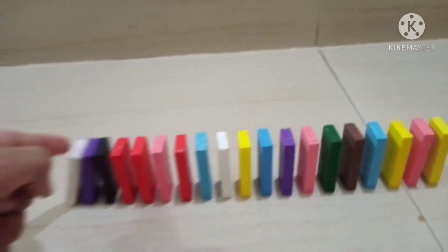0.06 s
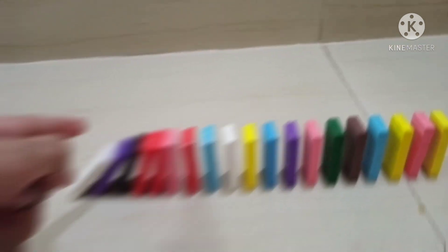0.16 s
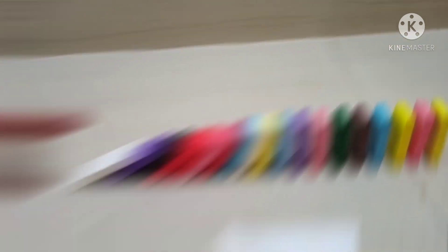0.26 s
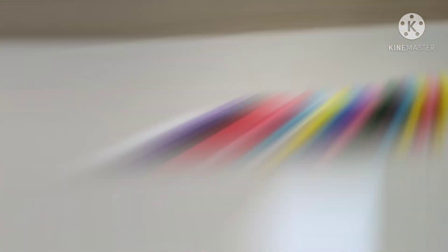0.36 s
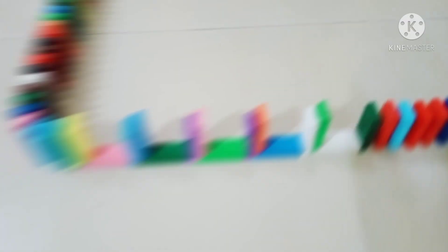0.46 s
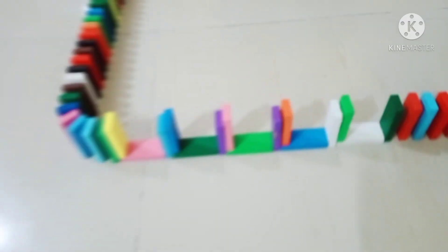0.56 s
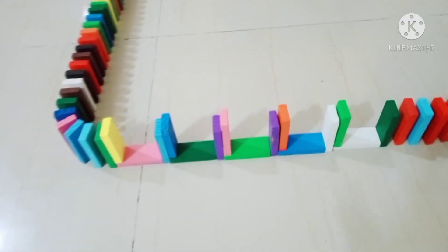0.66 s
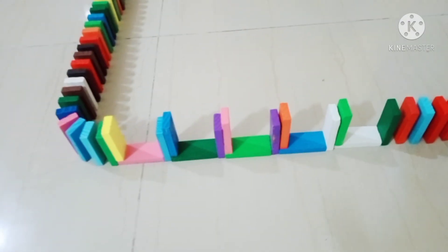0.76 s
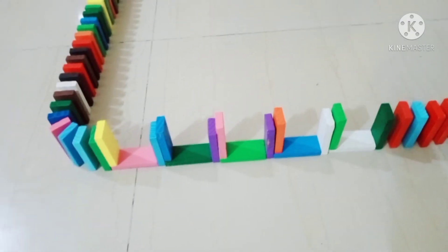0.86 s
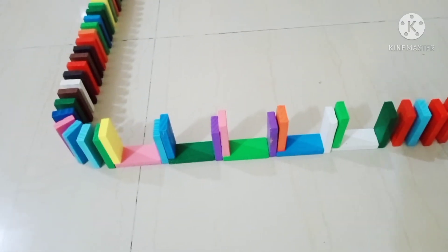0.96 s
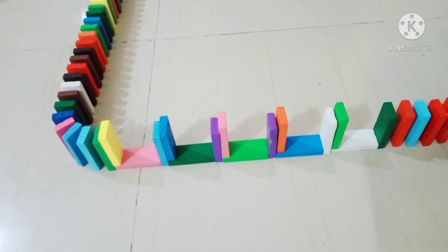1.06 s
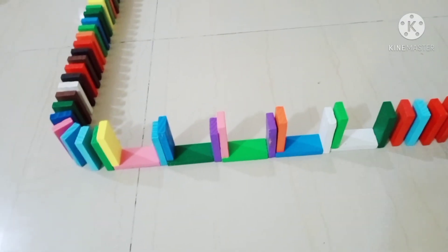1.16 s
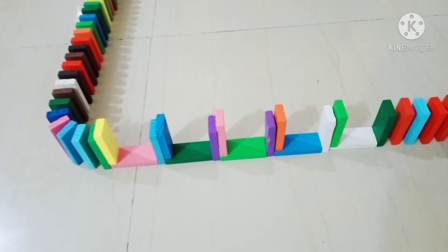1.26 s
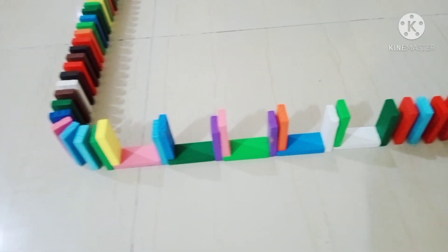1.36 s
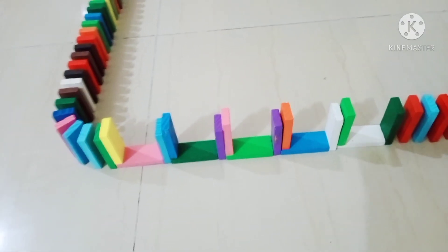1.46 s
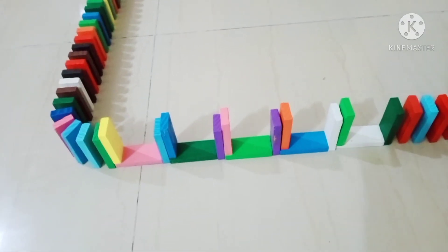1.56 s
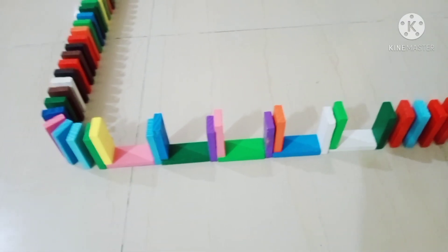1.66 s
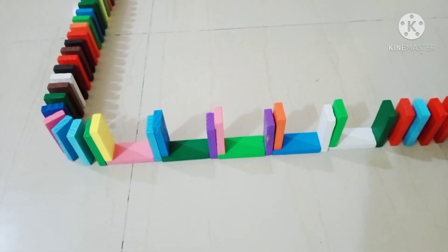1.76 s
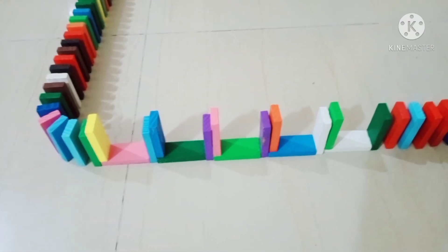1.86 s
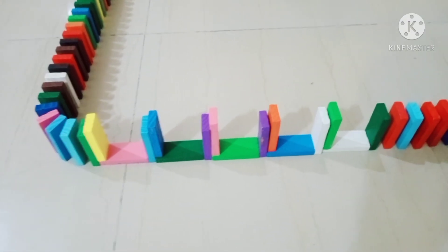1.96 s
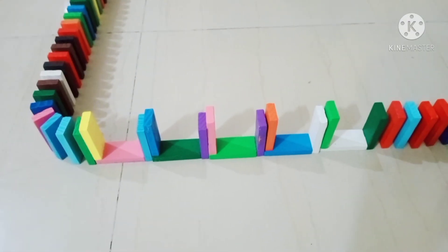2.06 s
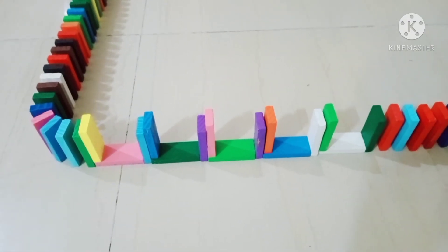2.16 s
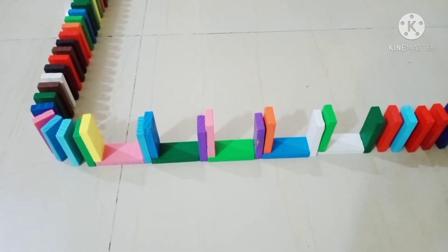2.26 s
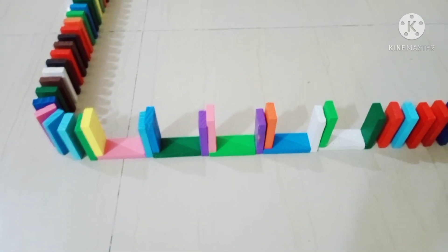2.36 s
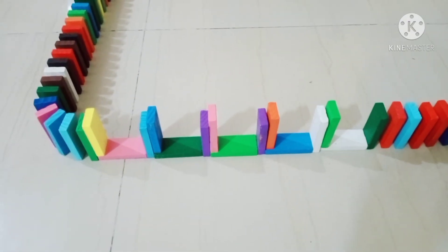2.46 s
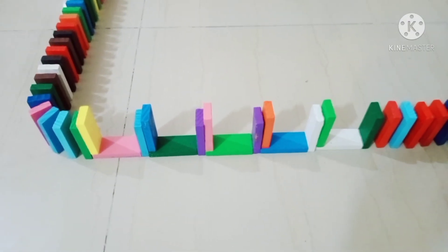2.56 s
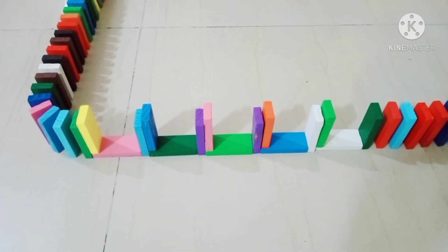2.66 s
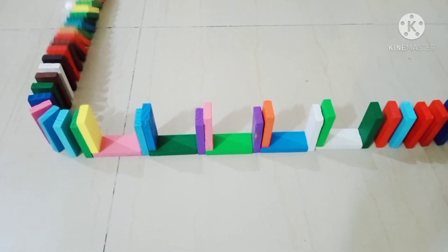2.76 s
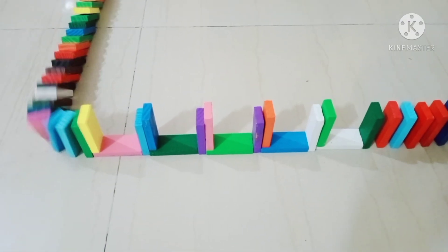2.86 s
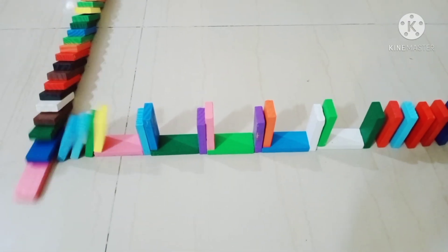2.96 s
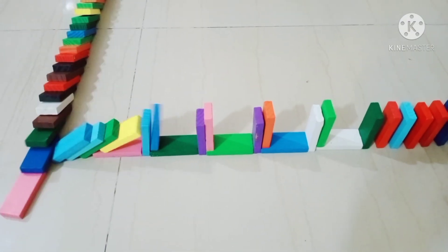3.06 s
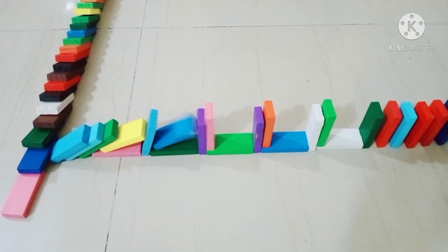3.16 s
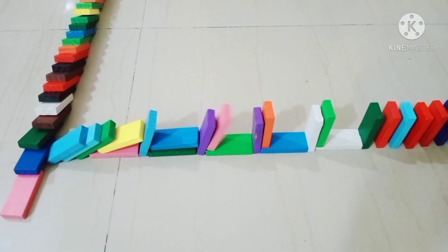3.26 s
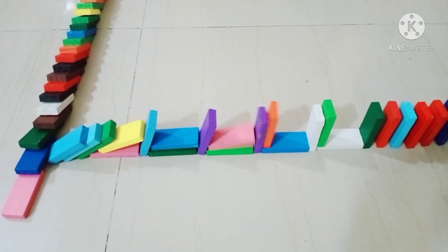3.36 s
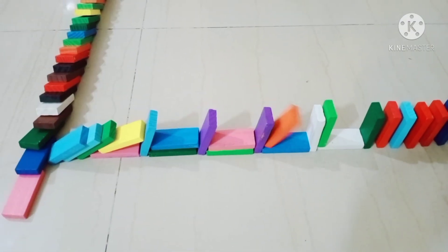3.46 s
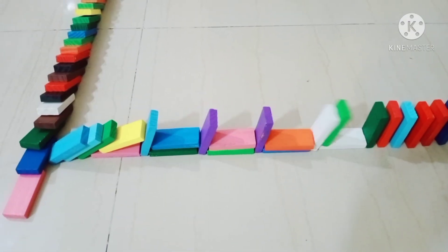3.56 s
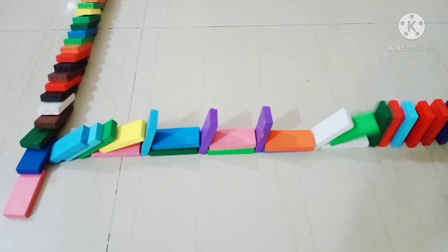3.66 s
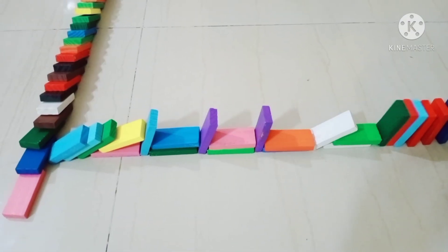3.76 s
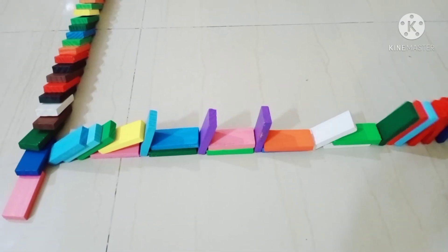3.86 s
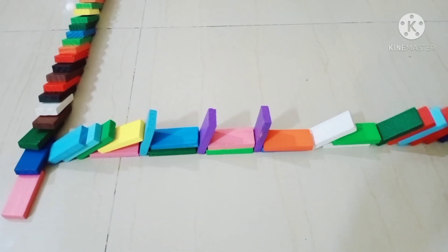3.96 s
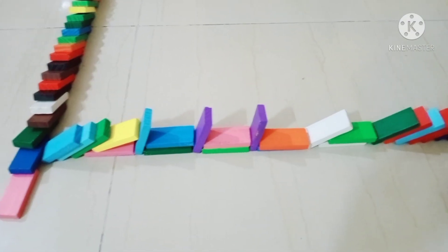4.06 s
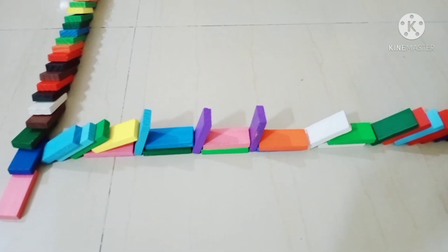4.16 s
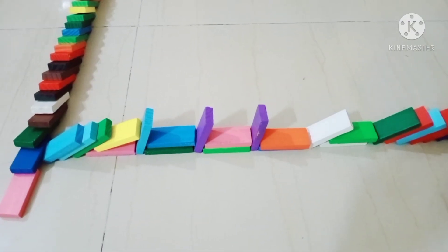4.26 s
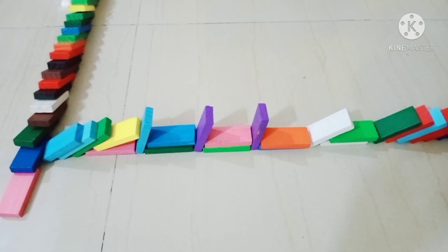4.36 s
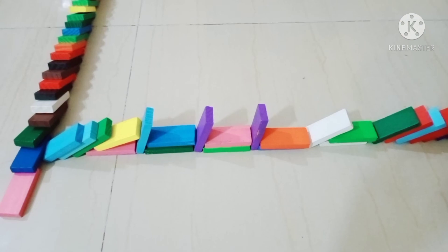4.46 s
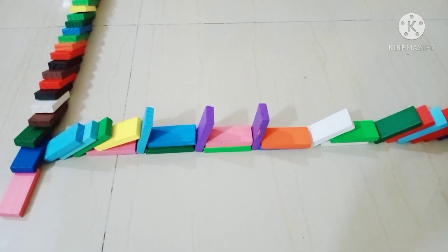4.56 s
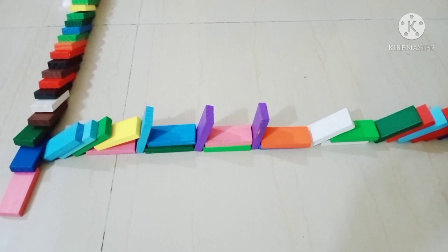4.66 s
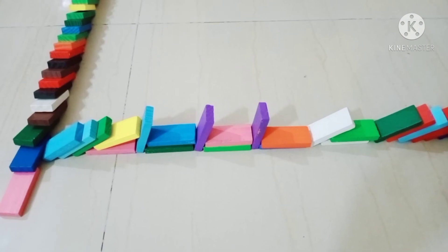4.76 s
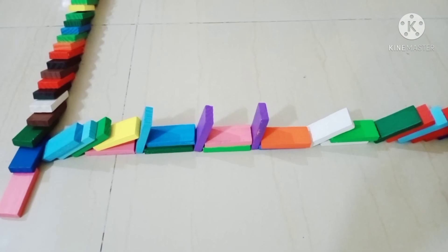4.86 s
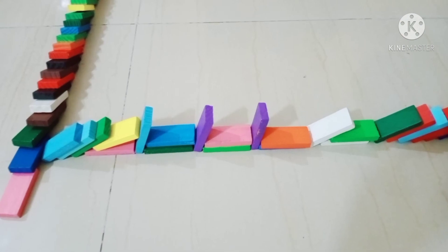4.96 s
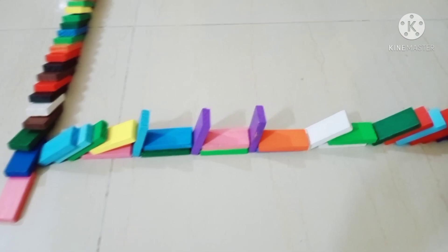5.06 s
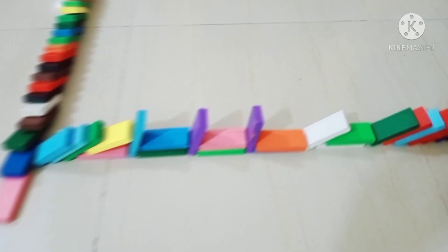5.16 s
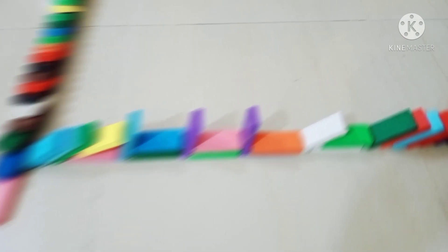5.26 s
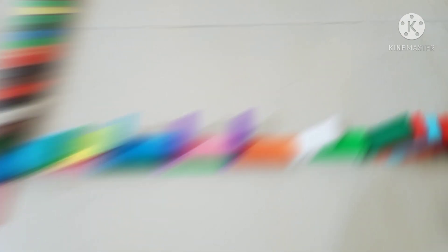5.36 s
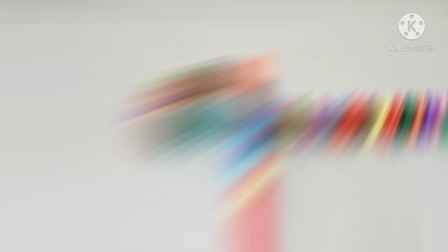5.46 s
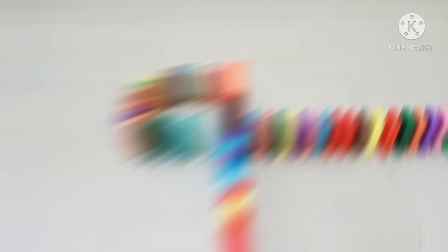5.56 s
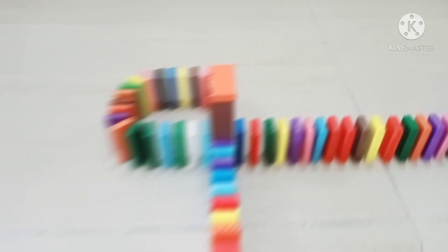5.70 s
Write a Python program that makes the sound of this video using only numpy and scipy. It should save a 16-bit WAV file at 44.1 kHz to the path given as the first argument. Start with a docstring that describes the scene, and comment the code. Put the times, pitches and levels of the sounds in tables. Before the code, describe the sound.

Close to a phone in a bare, hard-walled room, plastic dominoes start toppling, speeding up into a crisp burst that ends in a dull thump. After nearly two quiet seconds of faint room rumble, a second clatter passes, followed by separate sharp slaps of tile on tile. A third, dense clatter follows, then its bright echo fades into low room noise.

```python
"""Toppling rows of dominoes

Rows of plastic toy dominoes topple on a tiled floor in a bare room, close to a phone.
Three runs clatter past; around the second and up to the third, single tiles slap onto tiles lying flat.
Every collision is a short noise crack, decaying ring modes and a knock; a dense noise tail is the hard walls.
Under it lie filtered room noise, a faint low drone of wavering sines and one dull thump, a step in the
signal that swings back slowly."""
import sys
import numpy as np
from scipy import signal
from scipy.fft import rfft, irfft
from scipy.io import wavfile
from scipy.ndimage import uniform_filter1d

SR = 44100
rng = np.random.default_rng(int(sys.argv[2]) if len(sys.argv) > 2 else 0)


def transcribe(u):
    """Save the signal u as a 16-bit wav file named by the first command-line argument.

    u: samples, shape (n,) or (channels, n), limited to [-1, 1]; the rate is SR.
    q: integer samples, one column per channel.
    """
    v = np.clip(np.atleast_2d(u).T, -1, 1)
    q = np.round(v * 32767).astype(np.int16)
    wavfile.write(sys.argv[1], SR, q)


N = 252693
TIME = np.arange(N) / SR
TOP_HZ = 15700
CLICK_S = 0.00048  # reference length of a click: its main ring carries the energy of unit power held this long
THUMP_S = 0.5269

# a row gathers speed, tumbles on and runs out; its echo share grows or shrinks as the front moves off or nears:
# start/s, rise/s, hold/s, fall/s, clatter level at full speed/dB, typical ring f/Hz, typical knock f/Hz,
# basic knock level/dB, floor thud against the knock/dB, basic edge level/dB, room level at the start/dB,
# room growth/(dB/s)
RUNS = [(.24, .14, 0.054, .07, -30.5, 9230, 2750, -12, -17.5, -6, -4.5, -12),
        (2.461, 0.16, .15, 0.0738, -28.5, 8660, 3850, -15.5, -9, -14, -6.5, 5),
        (3.87, .09, .32, .05, -29, 8840, 3700, -16, -10, -11, -7.5, 14)]


def undb(db):
    """Decibels to gain."""
    return 10 ** (np.asarray(db) / 20)


def unit(x):
    """Scale to an rms of one."""
    return x / np.sqrt(np.mean(x ** 2))


def at_hz(points, hz):
    """Read a table on a log-frequency axis."""
    f, value = np.transpose(points)
    return np.interp(np.log(np.maximum(hz, 1)), np.log(f), value)


def noise(points):
    """Noise with the given spectrum, at an rms of one."""
    hz = np.arange(N // 2 + 1) * SR / N
    white = rfft(rng.standard_normal(N))
    return unit(irfft(white * undb(at_hz(points, hz)), N))


def band(x, lo_hz, hi_hz, order=2):
    """Band-pass filter."""
    edges_hz = [lo_hz, min(hi_hz, SR / 2 - 1)]
    return signal.sosfilt(signal.butter(order, edges_hz, "band", fs=SR, output="sos"), x)


def walk(rate):
    """Slow random drift with an rms of one: random steps, rate per second, smoothed into ramps."""
    size = int(SR / rate)
    steps = np.repeat(rng.standard_normal(N // size + 1), size)
    return unit(uniform_filter1d(steps, size)[:N])


def add(track, s, sound):
    """Mix a sound into a track at time s."""
    i = int(max(s, 0) * SR)
    track[i:i + len(sound)] += sound[:max(N - i, 0)]


def toppling(wall_knock_db=-2, wall_edge_db=-7.5):
    """The distinct collisions, as they reach the phone and as they spread toward the walls."""
    direct, spread = np.zeros(N), np.zeros(N)
    for s, db, ring_hz, knock_hz, knock_db, thud_db, edge_db, room_db in strikes():
        near = collision(ring_hz, knock_hz, knock_db, edge_db, thud_db=thud_db)
        toward_walls = blend(knock_hz, knock_db + wall_knock_db, edge_db + wall_edge_db)
        add(direct, s, undb(db) * near)
        add(spread, s, undb(db + room_db) * toward_walls)
    return direct, spread


def strikes():
    """Each distinct hit; a collision takes its colour from its run, its force and the speed of the row."""
    # the distinct collisions of the runs, from faint first taps to the hardest hits: t/s, level/dB, ring f/Hz
    run_hits = [(0.0856, -40, 8470), (0.1143, -39, 9740), (0.1591, -34, 9710), (0.1737, -40, 8360),
                (0.1992, -35, 9600), (0.2275, -29.5, 9630), (0.2573, -22.5, 9300), (0.2748, -25, 8900),
                (0.3167, -22.5, 8300), (0.3331, -16.5, 9290), (0.3554, -18.5, 9080), (0.3731, -14, 9270),
                (0.403, -10.5, 9060), (0.419, -17, 8300), (0.4321, -11, 8800), (0.4445, -7, 9020),
                (2.4278, -18, 9340), (2.463, -22.5, 9600), (2.5305, -12, 8570), (2.5469, -14.5, 8240),
                (2.5718, -9, 8000), (2.6263, -8.5, 8980), (2.6634, -11.5, 9300), (2.7153, -10.5, 8040),
                (2.7227, -10, 8656), (2.7391, -4.5, 9600), (2.761, -8.5, 9050), (2.795, -11.5, 8780),
                (2.8124, -11, 8350), (3.8676, -23, 9100), (3.8896, -13, 9080), (3.9157, -13.5, 9000),
                (3.9389, -7, 8830), (3.9603, -1.5, 8920), (3.9974, -9, 9000), (4.0169, -5, 8760),
                (4.0264, -11.5, 9010), (4.0361, -6, 8770), (4.1019, -9.5, 8800), (4.1185, -12, 8900),
                (4.129, -14, 8600), (4.142, -10, 8460), (4.1609, -10.5, 8260), (4.1758, -11, 8489),
                (4.2028, -13.5, 8554), (4.246, -0.5, 8276), (4.2618, -7, 8970)]
    # single tiles slap down:
    # t/s, level/dB, knock f/Hz, knock level/dB, floor thud against the knock/dB, edge level/dB, room level/dB
    single_slaps = [(2.2008, -19, 3970, -22, -17, -31, -4), (2.2889, -40.5, 3870, -9.5, -19, -28, -7.5),
                    (2.8729, -11.5, 5740, -4, -18, -9, -5.5), (2.9015, -8, 4000, -22.5, 3.5, -0.5, -0.5),
                    (3.0003, -18.5, 4544, -6, -8, -22.5, -1.5),
                    (3.1342, -11.5, 4770, -10.5, -22, -13.5, -7.5),
                    (3.155, -23, 4130, -10.5, -17.5, -32.5, -12), (3.3017, -20, 5050, 4, -27, -31.5, -5),
                    (3.3296, -26, 4630, 3.5, -18, -22, -18), (3.3509, -23, 4380, -1.5, -10, -20, -13),
                    (3.4756, -20.5, 4370, -7, -10, -14, -3.5), (3.4878, -15.5, 4160, -16, -11, -28, -5.5),
                    (3.5237, -5.5, 6400, -8, -11.5, -13, -6.5), (3.6268, -16, 3840, -4, -25, -19, -4.5),
                    (3.6353, -17.5, 4000, -25.5, -19, -18, 4), (3.6434, -19, 4350, -4.5, -9, -5, -11.5),
                    (3.6795, -11.5, 5900, -2.5, -24, -13.5, -9)]
    # a firm collision rings more than it knocks; each dB softer brings back some knock
    firm_db, firm_knock_db, knock_per_db = -17.5, -6, 0.462
    slow_edge_db = 0.5  # bright edge of a row that barely moves, against full speed
    slap_ring_hz = 8720

    for s, db, ring_hz in run_hits:
        nearest = min(RUNS, key=lambda run: abs(run[0] - s))
        start, rise, hold, fall, _, _, knock_hz, knock_db, thud_db, edge_db, room_db, growth = nearest
        knock_db += firm_knock_db + knock_per_db * (firm_db - db)
        edge_db += slow_edge_db * (1 - speed(s, start, rise, hold, fall))
        yield s, db, ring_hz, knock_hz, knock_db, thud_db, edge_db, room_db + growth * (s - start)
    for s, db, *colour in single_slaps:
        yield s, db, slap_ring_hz, *colour


def speed(s, start, rise, hold, fall):
    """How fast a row tumbles at time s, from 0 to 1."""
    return np.interp(s, start + np.cumsum([0, rise, hold, fall]), [0, 1, 1, 0])


def collision(ring_hz, knock_hz, knock_db, edge_db, knock_cycles=1.58, thud_db=-15, thud_s=0.00075,
              crack_db=-9, rattle_db=-9):
    """One tile meets another: the plastic cracks, knocks and rings, and the floor takes a short thud."""
    # modes of a tile's main ring, before tuning: f/Hz, relative level/dB, t60/s
    ring_modes = [(8675, 23, 0.015), (8170, -11, .007), (8860, -2, 0.018)]
    # modes of its bright edge, before tuning: f/Hz, relative level/dB, t60/s
    edge_modes = [(11800, -1.5, 0.018), (13330, -3, 0.0082), (14855, 1.5, 0.0049)]
    tile_hz = 8700  # ring pitch at which the main modes stay untuned
    contact_s, crack_s, rattle_s, uneven_db = .00013, .0008, .0012, 3
    t = np.arange(SR // 60) / SR

    press = 1 - np.exp(-t / contact_s)  # soft onset while the faces press together
    main = unit(press * ring(ring_modes, t, ring_hz / tile_hz, scatter=0.03, uneven_db=uneven_db))
    main = unit(main + undb(crack_db) * burst(t, crack_s, 7148, 9000, order=2))
    edge = unit(press * ring(edge_modes, t, 0.91, scatter=0.1, uneven_db=2 * uneven_db))

    # the knock dies within a few swings, then the loose tile buzzes on
    cycles = knock_hz * t
    knock = unit(np.sin(2 * np.pi * cycles) * cycles * np.exp(-2 * cycles / knock_cycles))
    knock = unit(knock + undb(rattle_db) * burst(t, rattle_s, knock_hz / 2, knock_hz, order=2))
    knock = knock + undb(thud_db) * burst(t, thud_s, 150, 2200, order=1)

    click = main + undb(knock_db) * knock + undb(edge_db) * edge
    return click * np.sqrt(CLICK_S / t[-1])  # the ring has unit level over one click length


def ring(modes, t, tune, scatter, uneven_db):
    """Decaying modes; each tile is tuned and struck a little differently."""
    hz, db, t60 = np.transpose(modes)[:, :, None]
    detune, strength = rng.standard_normal((2, len(modes), 1))
    phase = 2 * np.pi * hz * tune * (1 + scatter * detune) * t
    decay = np.exp(-np.log(1000) * t / t60)
    return np.sum(undb(db + uneven_db * strength) * np.sin(phase) * decay, axis=0)


def burst(t, decay_s, lo_hz, hi_hz, order):
    """A very short crack of decaying noise in one band."""
    crack = rng.standard_normal(len(t)) * np.exp(-t / decay_s)
    return unit(band(crack, lo_hz, hi_hz, order=order))


def blend(knock_hz, knock_db, edge_db, ring_lo_hz=7950, ring_hi_hz=9450, edge_lo_hz=10600,
          edge_hi_hz=15300, knock_width=1.797):
    """A collision as the walls hear it: the modes of all faces of both tiles merge into three broad humps."""
    tap = signal.unit_impulse(SR // 100)
    main = unit(band(tap, ring_lo_hz, ring_hi_hz, order=2))
    knock = unit(band(tap, knock_hz / knock_width, knock_hz * knock_width, order=2))
    edge = unit(band(np.roll(tap, SR // 1000), edge_lo_hz, edge_hi_hz, order=4))  # 1 ms later
    return (main + undb(knock_db) * knock + undb(edge_db) * edge) * np.sqrt(CLICK_S * SR / len(tap))


def clatter(ring_spread=.042, knock_spread=0.26, colour_spread_db=3, slow_knock_db=8, edge_lift_db=1):
    """Behind the front of a run, leaning tiles slide and chatter: denser, louder, less hollow with speed."""
    slow_rate, full_rate = 90, 260  # contacts a second
    slow_db = -20.5  # clatter level of a row that barely moves, against full speed
    size_spread_db = 5
    direct, spread = np.zeros(N), np.zeros(N)
    for start, rise, hold, fall, db, ring_hz, knock_hz, knock_db, thud_db, edge_db, room_db, growth in RUNS:
        late, size, tune, hollow, bright = rng.standard_normal(size=(200, 5)).T
        waits = np.exp(late / 2)  # uneven gaps, in typical contact intervals
        gains = unit(undb(size_spread_db * np.clip(size, -2, 1.3)))  # clicks share the power unevenly
        when = start
        for wait, gain, z, h, b in zip(waits, gains, tune, hollow, bright):
            if when > start + rise + hold + fall:
                break
            slow = 1 - speed(when, start, rise, hold, fall)
            rate = full_rate * (slow_rate / full_rate) ** slow
            click = collision(ring_hz * (1 + ring_spread * z),
                              knock_hz * np.exp(knock_spread * h),
                              knock_db + slow_knock_db * slow,
                              edge_db + edge_lift_db + colour_spread_db * b,
                              thud_db=thud_db)
            # denser clicks are each weaker, so the level does not depend on the rate
            click = click * gain * undb(db + slow_db * slow) / np.sqrt(rate * CLICK_S)
            add(direct, when, click)
            add(spread, when, undb(room_db + growth * (when - start)) * click)
            when += wait / rate
    return direct, spread


def room(x, first_s=0.00066, build_s=0.00047):
    """Hard walls: a dense noise tail that builds up quickly, each band decaying at its own pace."""
    # colour of the echo: f/Hz, relative level/dB
    wall_levels = [(200, -0.5), (1000, 3), (2500, 1.9), (5500, 1.5), (9000, -6.5), (15000, -0.5)]
    # decay of the echo, shortest at the top: f/Hz, t60/s
    wall_decays = [(500, 0.79), (2000, 0.51), (6000, 0.62), (9000, 0.5305), (15000, 0.27)]
    t = np.arange(SR * 3 // 4) / SR
    hz = np.arange(len(t) // 2 + 1) * SR / len(t)
    spectrum = rfft(rng.standard_normal(len(t)))
    edges_hz = np.geomspace(60, 18000, 41)
    tail = np.zeros(len(t))
    for lo, hi in zip(edges_hz, edges_hz[1:]):
        centre = np.sqrt(lo * hi)
        part = irfft(spectrum * ((hz >= lo) & (hz < hi)), len(t))
        tail += part * undb(at_hz(wall_levels, centre) - 60 * t / at_hz(wall_decays, centre))
    tail *= 1 - np.exp(-np.maximum(t - first_s, 0) / build_s)
    return signal.fftconvolve(x, tail / np.sqrt(np.sum(tail ** 2)))[:N]


def dull_thump(thump_db=-6, low_hz=80, low_s=0.0047, low_db=-6, snap_s=0.00067, tick_db=-16):
    """A dull thump: a sudden step in the signal that swings back slowly, with a bright tick on top."""
    t = np.arange(SR // 20) / SR
    step = -np.exp(-t / snap_s)
    swing = undb(low_db) * np.exp(-t / low_s) * np.sin(2 * np.pi * low_hz * t)
    low, tick = np.zeros(N), np.zeros(N)
    add(low, THUMP_S, undb(thump_db) * (swing + step))
    # the tick borrows the ring of a collision
    add(tick, THUMP_S, undb(tick_db) * collision(ring_hz=8690, knock_hz=2700, knock_db=-36, edge_db=-15))
    return band(low, 22, 2800, order=1), tick


def drone(waver_hz=5, waver_db=2.5, rush_db=-12):
    """Low sines that waver in pitch and level, with a dull rush of noise that follows their power."""
    # the drone swells twice: t/s, level/dB
    drone_swells = [(2.42, -48), (4.391, -44)]
    # the tones of each swell: delay/s, middle f/Hz, level against the swell/dB, rise/s, fade/s
    swell_tones = [(0, 259.5, 1.5, 0.051, 0.05), (.065, 159, 0.5, 0.17, .25), (.08, 254, -7, .13, .35)]
    # a hum follows the last swell: middle f/Hz, level/dB
    hum_tones = [(230, -55), (346, -56)]
    hum_s, hum_rise_s, hum_fade_s = 4.82, 0.21, 2

    voices = []
    for s, db in drone_swells:
        for delay, hz, tone_db, rise, fade in swell_tones:
            voices.append((s + delay, hz, db + tone_db, rise, fade))
    for hz, db in hum_tones:
        voices.append((hum_s, hz, db, hum_rise_s, hum_fade_s))

    tones, power = np.zeros(N), np.zeros(N)
    for s, hz, db, rise, fade in voices:
        envelope = np.clip((TIME - s) / rise, 0, 1) * np.exp(-np.maximum(TIME - s - rise, 0) / fade)
        size = undb(db) * envelope
        phase = 2 * np.pi * np.cumsum(hz + waver_hz * walk(25)) / SR
        tones += size * undb(waver_db * walk(18)) * unit(np.sin(phase))
        power += size ** 2
    rush = unit(band(rng.standard_normal(N), 340, 950))
    return tones + undb(rush_db) * np.sqrt(power) * rush


def faint_sounds(whine_s=1.088, whine_len_s=0.27, whine_db=-64, tap_s=5.272, tap_db=-42, tap_len_s=0.0022,
                 hiss_s=5.26, hiss_len_s=0.5, hiss_db=-70):
    """A thin whine, one soft tap and a brief airy hiss, each a noise band under its own envelope."""
    whine = unit(band(rng.standard_normal(N), 1640, 1925))
    whine = whine * np.exp(-((TIME - whine_s) / whine_len_s) ** 2)
    tap = unit(band(rng.standard_normal(N), 575, 1400))
    tap = tap * (TIME > tap_s) * np.exp(-np.abs(TIME - tap_s) / tap_len_s)
    tap = band(tap, 400, 1900)  # softens the sudden start
    hiss = unit(band(rng.standard_normal(N), 9500, 22000))
    hiss = hiss * np.exp(-np.square(((TIME - hiss_s) / hiss_len_s) ** 2))  # flat-topped swell
    return undb(whine_db) * whine + undb(tap_db) * tap + undb(hiss_db) * hiss


def background(split_hz=5200, waver_db=1, flicker_db=3):
    """Room rumble and a thin flickering hiss from one shaped noise, plus soft swells of treble noise."""
    # room noise: f/Hz, relative level per Hz/dB
    air_spectrum = [(18, -55), (30, -25.5), (105, -4.5), (202, -6), (230, -1.5), (307, -6.5), (350, -8),
                    (492, -15.5), (691, -14.5), (1080, -20), (1290, -20.5), (3400, -24.5), (5310, -45.5),
                    (9190, -36.5), (15500, -75.5)]
    # middle level of the rumble, which wavers around it: t/s, level/dB
    rumble_levels = [(0, -54.5), (.9, -54), (2.2, -59.5), (2.7, -51), (3.4, -57), (4.5, -51.5), (5.7, -53)]
    # starts of the treble swells: t/s
    swell_times = [.759, 1.711, 4.5, 5.52]
    hiss_db, swell_db = -67, -55
    swell_rise_s, swell_fade_s = 0.046, 0.12

    s, level_db = np.transpose(rumble_levels)
    rumble_db = np.interp(TIME, s, level_db)
    air = noise(air_spectrum)
    rumble = unit(band(air, 20, split_hz, order=3)) * undb(rumble_db + waver_db * walk(6))
    hiss = unit(band(air, split_hz, TOP_HZ, order=3)) * undb(hiss_db + flicker_db * walk(22))
    swell = np.zeros(N)
    for s in swell_times:
        swell += np.clip((TIME - s) / swell_rise_s, 0, 1) * np.exp(-((TIME - s) / swell_fade_s) ** 2 / 2)
    treble = unit(band(rng.standard_normal(N), 7600, 9020))
    return rumble + hiss + undb(swell_db) * swell * treble


def scene(chatter_room_db=0, thump_room_db=-27):
    """Tiles, their echo, the thump and the quiet room."""
    quiet = background() + drone() + faint_sounds()
    thump, tick = dull_thump()
    hits, spread = toppling()
    chatter, chatter_spread = clatter()
    add(spread, THUMP_S, undb(thump_room_db) * blend(knock_hz=2550, knock_db=-8.5, edge_db=4.5))
    echo = room(spread + undb(chatter_room_db) * chatter_spread)
    return (hits + tick + chatter + echo + thump + quiet)[None]


def record(dry):
    """The phone cuts the top with a steep low-pass."""
    return signal.sosfilt(signal.ellip(8, .2, 70, TOP_HZ, fs=SR, output="sos"), dry)


dry = scene()
out = record(dry)
transcribe(out)
```